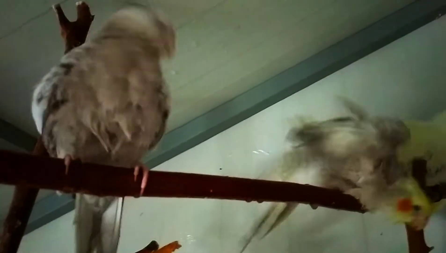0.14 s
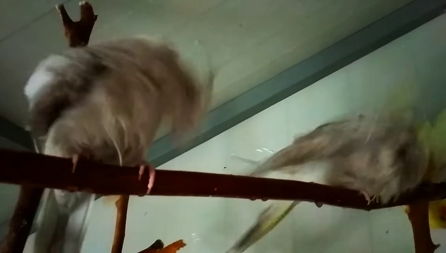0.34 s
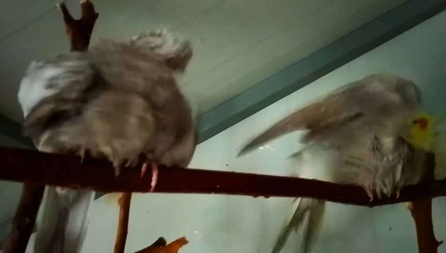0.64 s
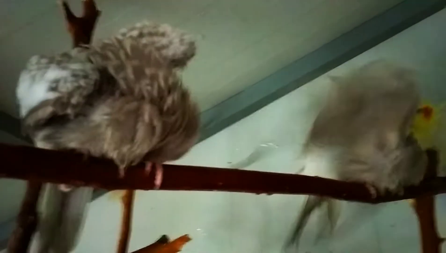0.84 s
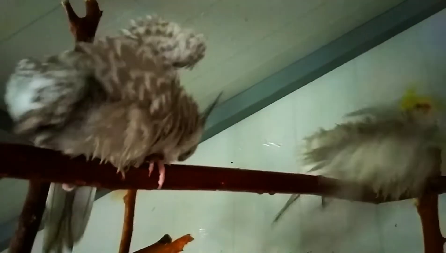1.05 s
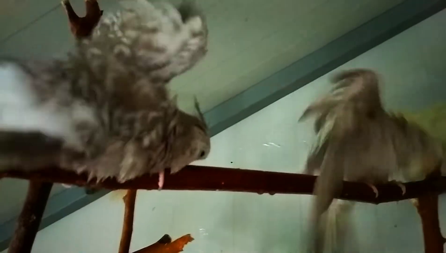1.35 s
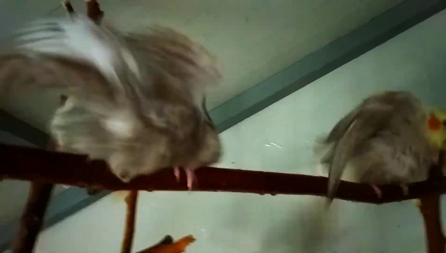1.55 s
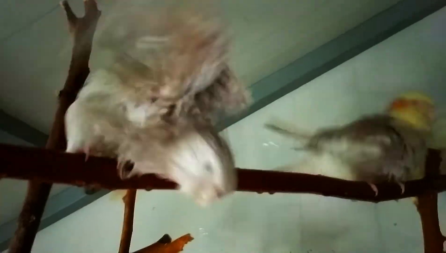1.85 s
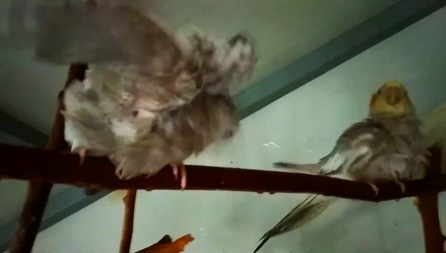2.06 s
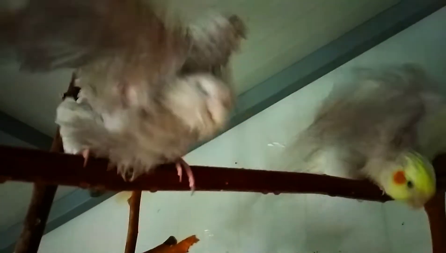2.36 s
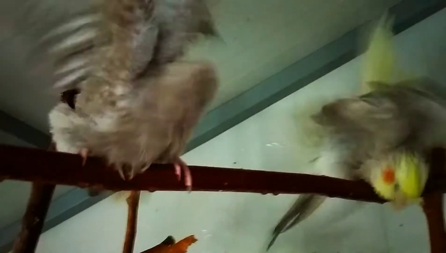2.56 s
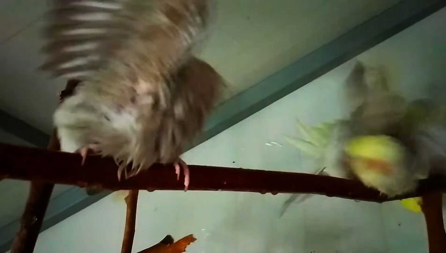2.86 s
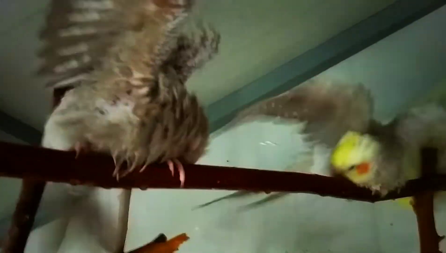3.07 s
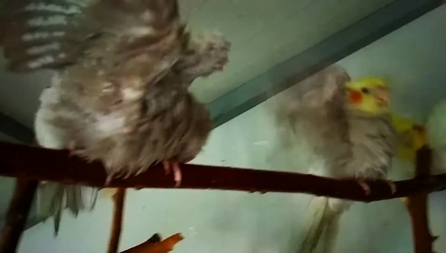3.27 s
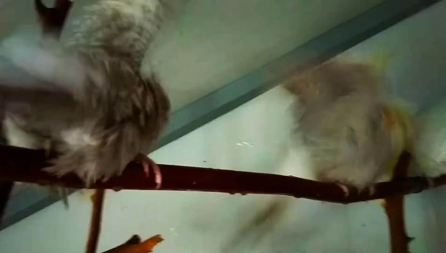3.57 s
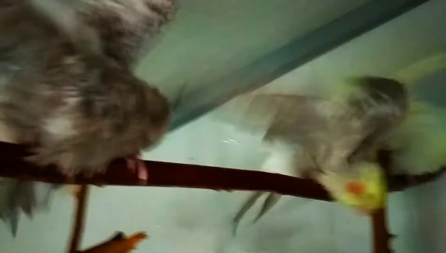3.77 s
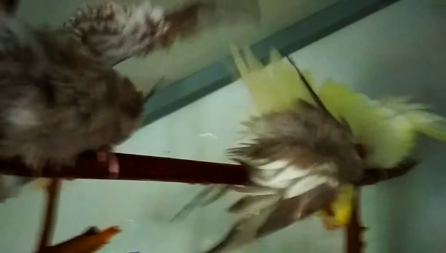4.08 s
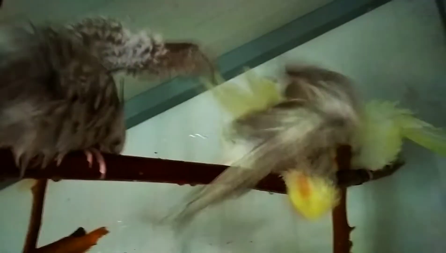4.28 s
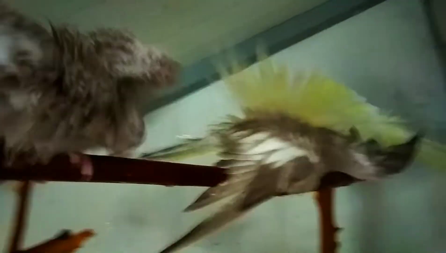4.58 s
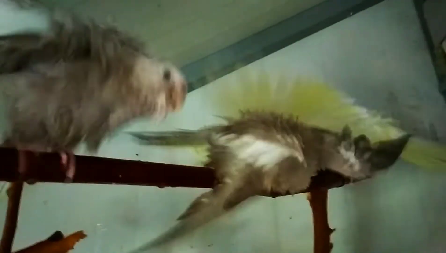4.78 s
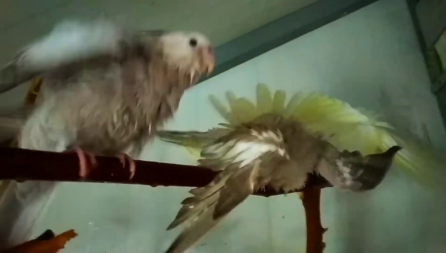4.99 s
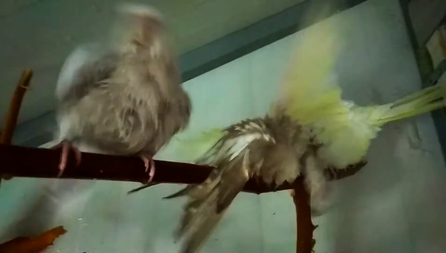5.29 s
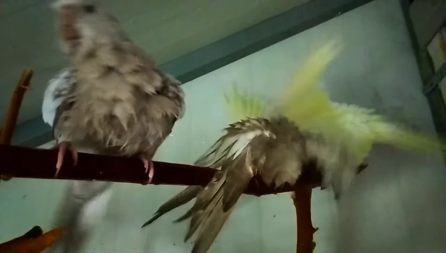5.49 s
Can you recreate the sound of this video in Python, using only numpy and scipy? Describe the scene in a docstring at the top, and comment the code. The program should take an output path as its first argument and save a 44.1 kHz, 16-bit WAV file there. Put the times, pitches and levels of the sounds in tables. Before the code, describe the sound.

Wet parrots shake and rustle their feathers in quick hissing strokes, with raspy chirps and sharp perch ticks over a low hum.

```python
"""Short hissing strokes come first: wet parrots on a perch shake and rub their feathers, barb slipping
past barb, over a low hum and the faint air of a small room. Beaks and claws tick on the wood. The flock
chatters in rough, throbbing whistles and cleaner bent ones, while farther birds mutter in tiny pips.
A few soft, hollow plops drop in between, and the walls add a very short ring to the birds."""
import sys
import numpy as np
from scipy import signal
from scipy.io import wavfile
from scipy.ndimage import uniform_filter1d

SR = 44100
rng = np.random.default_rng(int(sys.argv[2]) if len(sys.argv) > 2 else 0)


def file_out(sig):
    """Save sig as 16-bit WAV at sys.argv[1]."""
    # one column per channel
    cols = np.atleast_2d(sig).T
    # limit, then scale
    lim = np.clip(cols, -1, 1)
    pcm = np.round(lim * 32767).astype(np.int16)
    wavfile.write(sys.argv[1], SR, pcm)


N = 248724


def gain_of(db):
    return 10 ** (np.asarray(db) / 20)


def unit_rms(x):
    return x / np.sqrt(np.mean(x ** 2) + 1e-20)


def curve_at(points, hz):
    point_hz, value = np.transpose(points)
    return np.interp(np.log(hz + 1), np.log(point_hz + 1), value)


def add(mix, start, sound):
    part = mix[:, round(start * SR):][:, :sound.shape[1]]
    part += sound[:, :part.shape[1]]


def drift(count, size):
    """Random wander of rms 1, smoothed over size samples."""
    return unit_rms(uniform_filter1d(uniform_filter1d(rng.standard_normal(count), size), size))


# Stereo image of the noise, centred bass to wide treble: (frequency [Hz], left-right likeness [0-1])
STEREO_LIKENESS = [(60, 1), (130, 0.99), (290, 0.83), (640, 0.41), (1100, 0.067)]


def patchy_noise(spectra, patchy_db, size):
    """One stereo noise per spectrum: drifting patches in the treble, an even bass in the centre."""
    frames, hz = 2 * N // size + 5, np.fft.rfftfreq(size, 1 / SR)
    a, b, c, d, chance = rng.standard_normal((frames, len(hz), 5)).T
    streaks = unit_rms(uniform_filter1d(uniform_filter1d(chance, 2, axis=0), 5, axis=1))
    clouds = unit_rms(uniform_filter1d(uniform_filter1d(chance[::-1], 14, axis=0), 7, axis=1))
    likeness = np.clip(curve_at(STEREO_LIKENESS, hz), 0, 1)[:, None]
    left, diffuse = a + 1j * b, c + 1j * d
    # the treble reaches one side first, by a lead that wanders as the birds move
    lead_turns = clouds[:, ::-1] / 4 + hz[:, None] / 2500
    wide = .85 * left * np.exp(2j * np.pi * lead_turns) + .5 * diffuse
    right = likeness * left + np.sqrt(1 - likeness ** 2) * wide
    patches = np.array([left, right]) * gain_of(patchy_db * (1 - likeness) * (streaks + clouds))
    shaped = [patches * gain_of(curve_at(spectrum, hz))[:, None] for spectrum in spectra]
    return [unit_rms(signal.istft(bins, window="cosine", nperseg=size)[1][:, :N]) for bins in shaped]


# Feather strokes: (start [s], length [s], level [dB], high band over low [dB], peak position [0-1])
FEATHER_STROKES = [(0, 0.036, -21.5, 3, 0.23), (0.041, 0.089, -18, 7, 0.4), (0.163, 0.12, -23, 2, 0.34),
                   (0.266, 0.16, -16.5, 5, 0.53), (0.426, 0.12, -20.5, -1, .4),
                   (0.531, 0.1, -17.5, -13, 0.47), (0.644, 0.11, -18.5, 0, 0.64),
                   (0.743, 0.14, -19.5, -5.5, 0.17), (0.841, 0.089, -15.5, 3.5, 0.26),
                   (0.975, 0.094, -17.5, 1.5, 0.57), (1.144, 0.1, -18, -6, 0.63),
                   (1.335, 0.056, -15, 9, 0.8), (1.438, .085, -15, -6, 0.56), (1.512, 0.18, -28, -14, 0.18),
                   (1.678, 0.055, -17, 3.5, 0.53), (1.873, 0.053, -19.5, -6, 0.55),
                   (1.976, 0.072, -16, 14.5, 0.62), (2.085, 0.076, -28, 12, 0.36),
                   (2.292, 0.1, -21, 6, 0.55), (2.557, 0.066, -16, -22, 0.53), (2.666, .12, -16.5, -3, .3),
                   (3.016, 0.081, -17.5, 7.5, 0.35), (3.247, 0.14, -29.5, -3, 0.6),
                   (3.386, .11, -18, -2, 0.46), (3.769, 0.071, -15.5, 26, .7),
                   (4.006, 0.082, -28, 7.5, 0.3), (4.113, 0.079, -17.5, 14, 0.73),
                   (4.441, 0.12, -21, 1.5, 0.5), (4.866, 0.11, -14.5, 13, 0.21),
                   (5.013, 0.062, -17.5, -10, 0.56), (5.069, 0.068, -15.5, -12, 0.46),
                   (5.145, 0.047, -17, -5.5, 0.7), (5.191, .11, -17.5, -1.5, 0.77),
                   (5.309, 0.12, -21, -11, 0.17), (5.432, .15, -31.5, -2, 0.66),
                   (5.608, 0.068, -20.5, 2, 0.13)]
# Body of the rustle, the low band: (frequency [Hz], level [dB])
RUSTLE_BODY = [(500, -73), (1000, -24), (1900, -9), (2900, -2.5), (4500, -1), (5700, -2.5), (6900, -7.5),
               (8000, -18.5)]
# Sheen of the rustle, the high band: (frequency [Hz], level [dB])
RUSTLE_SHEEN = [(6000, -19.5), (7000, -10), (8900, 4), (10700, -2), (13000, -11.5), (15300, -22),
                (16500, -48)]


def feathers(slope_db=6, edge_db=9):
    """Barbs slip past each other in two bands of hiss; each stroke slopes to a peak between sharp ends."""
    t = np.arange(N) / SR
    body_power, sheen_power, spray_power = np.zeros((3, N))
    for start, length, db, sheen_db, peak_at in FEATHER_STROKES:
        rise, fall = peak_at * length, (1 - peak_at) * length
        peak = start + rise
        span = slice(max(round((peak - 2 * rise) * SR), 0), round((peak + 2 * fall) * SR))
        from_peak = abs(t[span] - peak) / np.where(t[span] < peak, rise, fall)
        power = gain_of(db - slope_db * from_peak - edge_db * from_peak ** 10) ** 2
        brightness = 1 / (1 + gain_of(-sheen_db) ** 2)
        body_power[span] += power * (1 - brightness)
        sheen_power[span] += power * brightness
        spray_power[span] += 0.5 * power * brightness ** 8  # the brightest strokes fling fizzing drops
    barb_clumps = unit_rms(gain_of(drift(N, size=60) + 1.5 * drift(N, size=400)))
    body, sheen = patchy_noise([RUSTLE_BODY, RUSTLE_SHEEN], patchy_db=3, size=512)
    fizz = unit_rms(np.gradient(np.gradient(sheen, axis=1), axis=1))
    rustle = np.sqrt(body_power) * body + np.sqrt(sheen_power) * sheen + np.sqrt(spray_power) * fizz
    return barb_clumps * rustle


# Slow fade of the hum bed: (time [s], level [dB])
HUM_FADE = [(0, -42.5), (1.5, -49.5), (5.64, -51.5)]
# Colour of the hum bed: (frequency [Hz], level [dB])
HUM_SPECTRUM = [(25, -48), (50, -18), (82, 8), (118, -1.5), (150, 1), (200, -17.5), (300, -70)]
# Tones that swell out of the hum: (start [s], length [s], pitch [Hz], level [dB])
HUM_SWELLS = [(0.0075, 0.47, 79.4, -43), (0.62, 1.25, 147, -50), (0.026, 0.61, 362, -53),
              (3.82, 0.135, 150, -45)]


def hum():
    """A bed of low noise sinks slowly, and a few wavering tones die away in it."""
    fade = gain_of(np.interp(np.arange(N) / SR, *np.transpose(HUM_FADE)))
    bed = fade * patchy_noise([HUM_SPECTRUM], patchy_db=1, size=4096)[0]
    for start, length, hz, db in HUM_SWELLS:
        u = np.linspace(0, 1, round(length * SR))
        turns = np.cumsum(hz * (1 + 0.023 * drift(len(u), size=3000))) / SR
        swell = gain_of(db - 5.5 * u + 3.8 * drift(len(u), size=2500)) * signal.windows.tukey(len(u), .1)
        add(bed, start, np.tile(np.sqrt(2) * swell * np.sin(2 * np.pi * turns), (2, 1)))
    return bed


# Colour of the room tone: (frequency [Hz], level [dB])
ROOM_SPECTRUM = [(120, -52), (200, -10), (899, -16), (1350, -3), (2470, -1.5), (5420, -13.5), (9060, -10),
                 (14100, -23), (15100, -32), (16000, -56)]


def room_tone(db=-33):
    """A faint, wide hiss whose treble flickers."""
    return gain_of(db) * patchy_noise([ROOM_SPECTRUM], patchy_db=3, size=512)[0]


def far_flock(count=260):
    """Farther birds mutter: brief bent pips of random pitch, level and pan."""
    out, u = np.zeros((2, N)), np.linspace(0, 1, 900)
    for when, pitch, bend, loudness, side in rng.random((count, 5)):
        hz = 1000 * 3.5 ** pitch * (1 + .3 * (bend - .5) * u)
        pip = np.sin(np.pi * u) ** 2 * np.sin(2 * np.pi * (np.cumsum(hz) / SR + rng.random((2, 1))))
        pan_db = 8 * (side - .5) * np.array([[1], [-1]])
        add(out, when * N / SR, gain_of(-47 + 9 * loudness + 5 * pitch + pan_db) * pip)
    return out


# Beak and claw hits on the perch: (time [s], left peak level [dB])
PERCH_TICKS = [(.0308, -2), (.066, -8), (1.3204, -5), (1.663, -12), (1.711, -8), (2.640, -11), (3.7625, -9),
               (3.832, -10), (3.918, -14), (3.940, -11), (4.294, -17), (4.487, -6), (4.872, -8)]
# Ring of one hit: (frequency [Hz], level [dB], time to fall 60 dB [s])
PERCH_MODES = [(4400, -6.5, 0.0071), (6730, -2, 0.0093), (10120, 3.5, 0.0047), (13100, -3, 0.0028),
               (2130, -6, 0.0019)]


def perch_tick(db, attack_s=0.000067):
    """A hard tap on wood rings a few bright modes for some milliseconds, stronger on the left."""
    t, detune = np.arange(600) / SR, rng.uniform(0.865, 1.124, (2, 1))
    ring = sum(gain_of(mode_db - 60 * t / t60) * np.sin(2 * np.pi * hz * detune * t)
               for hz, mode_db, t60 in PERCH_MODES)
    ring *= 1 - np.exp(-t / attack_s)
    return gain_of(db) * ring / abs(ring).max(1, keepdims=True) * gain_of([[0], [-4]])


def resonate(x, hz, width_hz):
    """A steep resonance that follows the pitch curve: shift down to zero, smooth twice, shift back."""
    carrier, pole = np.exp(2j * np.pi * np.cumsum(hz) / SR), np.exp(-np.pi * width_hz / SR)
    return 2 * (carrier * signal.lfilter([(1 - pole) ** 2], [1, -2 * pole, pole ** 2], x / carrier)).real


# Rough calls: (start [s], length [s], level [dB], pitch [Hz], clear-tone share [0-1, capped in play])
CHATTER_NOTES = [(0.085, 0.066, -28.5, 2755, 0.14), (0.26, 0.036, -22, 4600, 0.07),
                 (0.596, 0.11, -22.5, 3363, 0.3), (0.943, 0.09, -23.5, 4260, 0.8),
                 (1.555, 0.1, -32, 2910, 0.7), (2.096, 0.06, -29, 2830, 0),
                 (2.145, 0.078, -27.5, 3310, 0.36), (2.216, 0.079, -25, 3780, 0.7),
                 (2.392, 0.12, -32.5, 2700, 0), (2.746, 0.07, -22, 3900, 0.7),
                 (2.994, 0.087, -29, 2800, 0.1), (3.124, 0.076, -30, 3330, 0),
                 (3.348, 0.073, -25.5, 3170, 0.06), (3.57, 0.084, -28.5, 3130, 0.2),
                 (3.674, 0.066, -30.5, 2870, 0), (4.007, .085, -32.5, 3240, 0.2),
                 (4.084, 0.048, -29.5, 3100, 1), (4.16, 0.07, -27.5, 3554, 0.46),
                 (4.179, 0.051, -27.5, 2760, 0.2), (4.294, .084, -35, 2515, 0.2),
                 (4.468, 0.052, -19.5, 4320, 0.66), (4.762, 0.047, -31, 3010, 0.4),
                 (4.925, 0.036, -20, 4480, 0.25), (5.323, 0.07, -22, 2460, 0.78),
                 (5.47, 0.11, -24.5, 2560, 0.35)]


def chatter(length, db, pitch_hz, clear, arch=0.0822, throb_hz=190):
    """A whistle with two overtones arches up, sags again and throbs inside its own rasp."""
    count, clear = round(length * SR), np.clip(clear, 0, .65)
    u = np.linspace(-1, 1, count)
    tilt = 0.098 * rng.uniform(-0.54, 0.543)
    hz = pitch_hz * (1 - arch * u ** 2 + tilt * u)
    turns = np.cumsum(hz * (1 + .025 * drift(count, size=80))) / SR + rng.random((2, 1))
    throb = 1 + .45 * np.sin(2 * np.pi * np.cumsum(throb_hz * (1 + .2 * drift(count, size=300))) / SR)
    tone = sum(gain_of(k_db) * np.sin(2 * np.pi * k * turns) for k, k_db in ((1, -15), (2, -25), (3, -31)))
    air = rng.standard_normal((2, count))
    rasp = unit_rms(resonate(air, hz, width_hz=1040))
    rasp += gain_of(-15.5) * unit_rms(resonate(air, hz / 2, width_hz=270))
    voice = unit_rms(throb * (np.sqrt(clear) * unit_rms(tone) + np.sqrt(1 - clear) * unit_rms(rasp)))
    return gain_of(db) * voice * signal.windows.tukey(count, .6)


# Clear calls: (start [s], length [s], level [dB], first pitch [Hz], middle pitch [Hz], last pitch [Hz])
WHISTLE_NOTES = [(.224, 0.042, -35, 1420, 1360, 1320), (.295, .065, -33.5, 1377, 1410, 1365),
                 (1.53, 0.048, -28, 2130, 2554, 2000), (1.566, 0.032, -26.5, 3200, 3400, 3350),
                 (1.583, 0.046, -33, 2750, 2720, 2830), (2.434, 0.048, -28.5, 2890, 2550, 2520),
                 (2.936, .067, -27.5, 3720, 4023, 3940), (3.004, .104, -28.5, 3450, 3940, 4230),
                 (3.6, 0.058, -29.5, 3470, 3590, 3610), (4.052, .22, -43.5, 778, 1234, 1280),
                 (4.675, 0.054, -26.5, 3256, 3310, 3160), (4.734, 0.051, -33, 2830, 2490, 2600),
                 (4.922, 0.09, -37.5, 1510, 1380, 1320), (5.444, 0.04, -28, 1970, 2710, 1730),
                 (5.47, .05, -31.5, 1743, 1754, 1790)]


def whistle(length, db, *pitches_hz, throb_hz=210, rough_from_hz=2500, rough_full_hz=4400):
    """A nearly clean sine bends through three pitches; high calls throb and rasp, low ones sit right."""
    count, middle_hz = round(length * SR), pitches_hz[1]
    hz = np.polyval(np.polyfit([0, .5, 1], pitches_hz, 2), np.linspace(0, 1, count))
    rough = np.clip((middle_hz - rough_from_hz) / (rough_full_hz - rough_from_hz), 0, 1)
    turns = np.cumsum(hz * (1 + .015 * drift(count, size=150))) / SR + rough * rng.random((2, 1))
    throb = 1 + rough * np.sin(2 * np.pi * np.cumsum(throb_hz * (1 + .1 * drift(count, size=300))) / SR)
    rasp = unit_rms(resonate(rng.standard_normal((2, count)), hz, width_hz=550))
    tone = np.sin(2 * np.pi * turns) + (.15 + .3 * rough) * rasp
    flutter = gain_of(db + 2.5 * drift(count, size=200))
    pan = gain_of((middle_hz < rough_from_hz) * np.array([[-2.5], [2.5]]))
    return np.sqrt(2) * throb * flutter * tone * signal.windows.tukey(count, .4) * pan


# Soft hollow plops: (time [s], peak level [dB], pitch [Hz])
HOLLOW_PLOPS = [(0.621, -37, 432), (1.185, -32.5, 1153), (2.023, -37.5, 802), (2.877, -38, 824),
                (3.075, -34, 1150)]


def plop(db, hz):
    """A short rounded tone that rises a little, dead centre."""
    u = np.linspace(0, 1, 1300)
    turns = np.cumsum(hz * (0.947 + 0.12 * u)) / SR
    envelope = gain_of(db) * np.sin(np.pi * u ** 0.74) ** 2
    return np.tile(envelope * np.sin(2 * np.pi * turns), (2, 1))


def wall_reflections(sound, t60=0.06, db=-7):
    """Close walls return sparse echoes that die quickly, differently on each side."""
    t = np.arange(6000) / SR
    taps = rng.choice([-1., 1.], (2, len(t))) * (rng.random((2, len(t))) < .05) * gain_of(-60 * t / t60)
    return gain_of(db) * signal.fftconvolve(sound, taps / np.linalg.norm(taps[0]), axes=1)[:, :N]


def scene():
    """The birds and their reflections sit on a bed of hum and room tone."""
    birds = feathers() * gain_of([[.3], [-.3]]) + far_flock()
    for voice, cues in ((chatter, CHATTER_NOTES), (perch_tick, PERCH_TICKS),
                        (plop, HOLLOW_PLOPS), (whistle, WHISTLE_NOTES)):
        for start, *settings in cues:
            add(birds, start, voice(*settings))
    return room_tone() + birds + wall_reflections(birds) + hum()


def record(dry, cutoff_hz=16000):
    """A steep low-pass trims the very top of the mix."""
    lowpass = signal.firwin(511, cutoff_hz, window=("kaiser", 9), fs=SR)
    return signal.oaconvolve(dry, lowpass[None], "same")


dry = scene()
out = record(dry)
file_out(out)
```